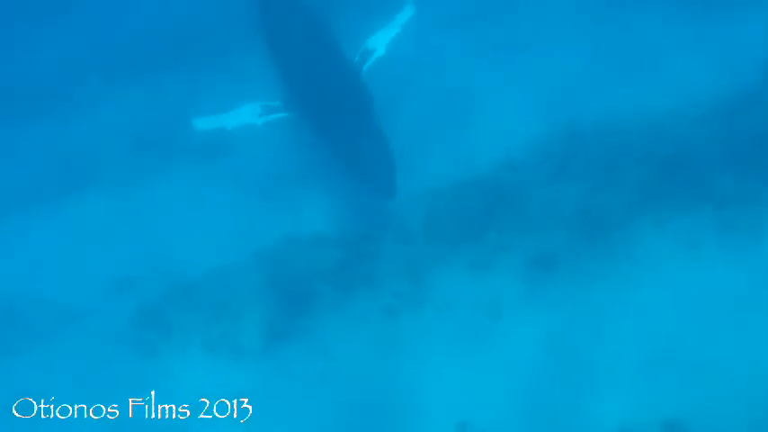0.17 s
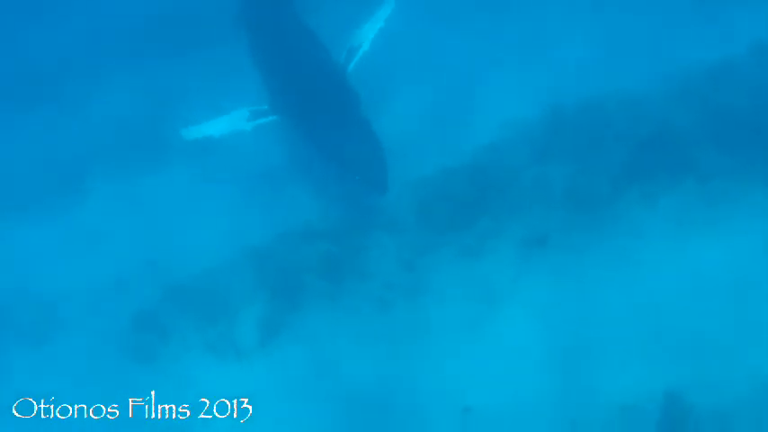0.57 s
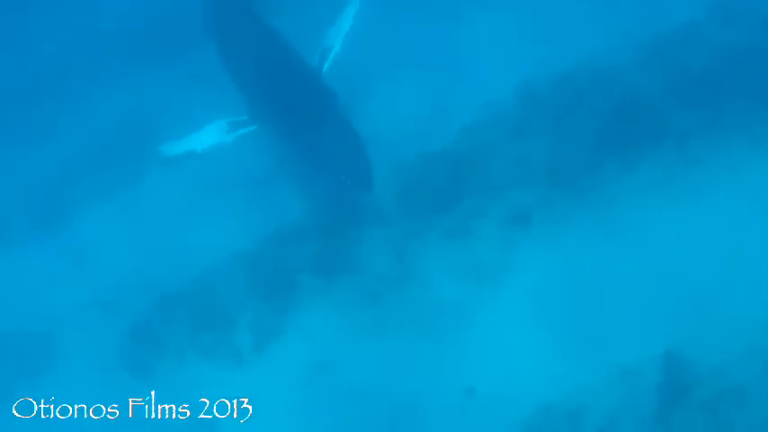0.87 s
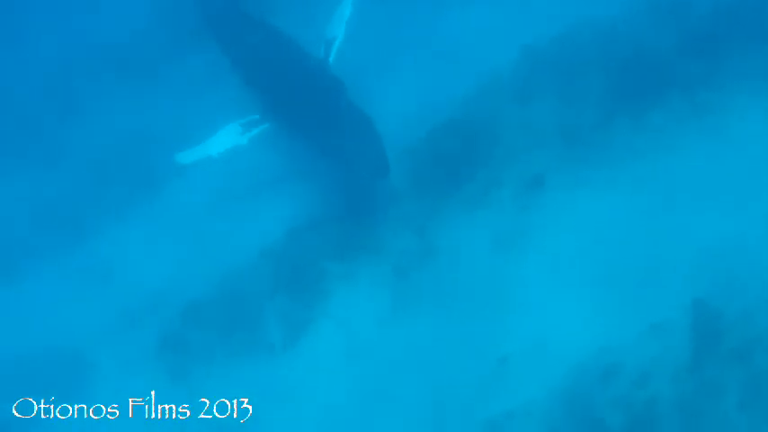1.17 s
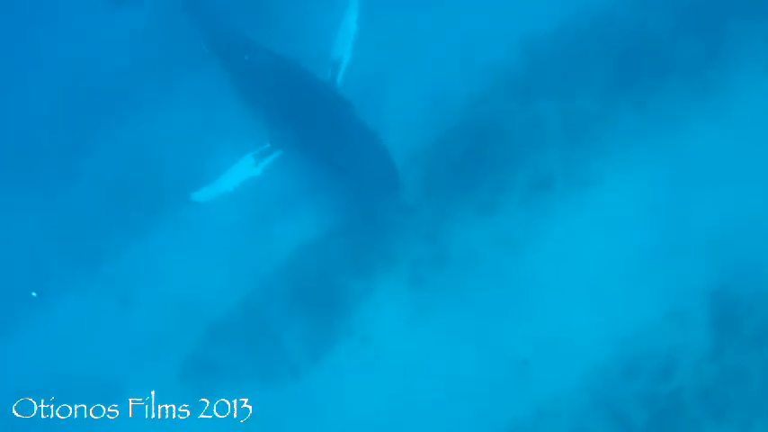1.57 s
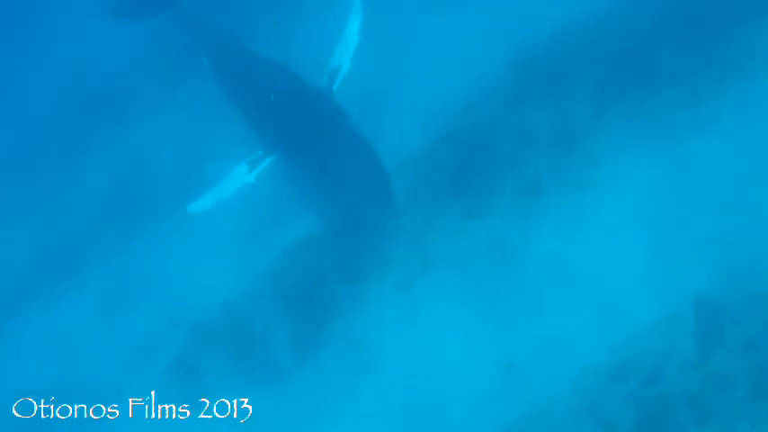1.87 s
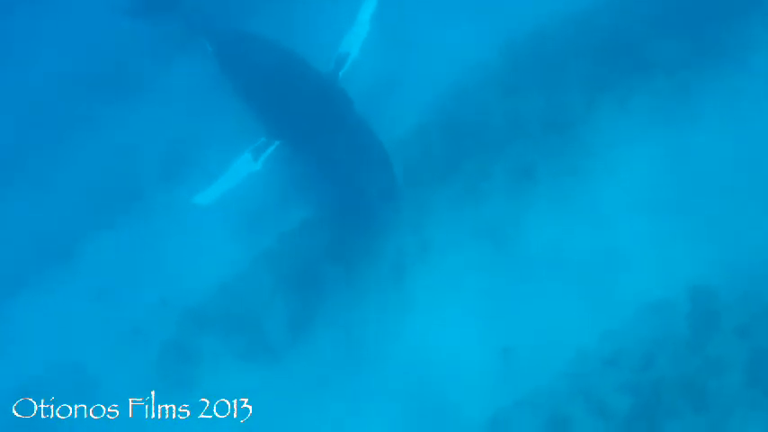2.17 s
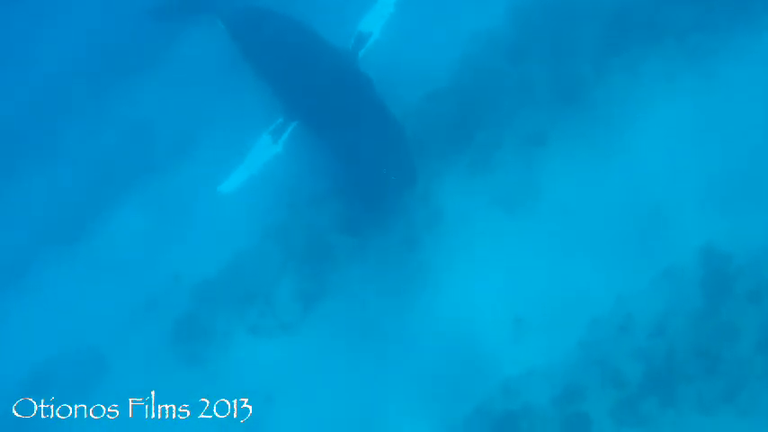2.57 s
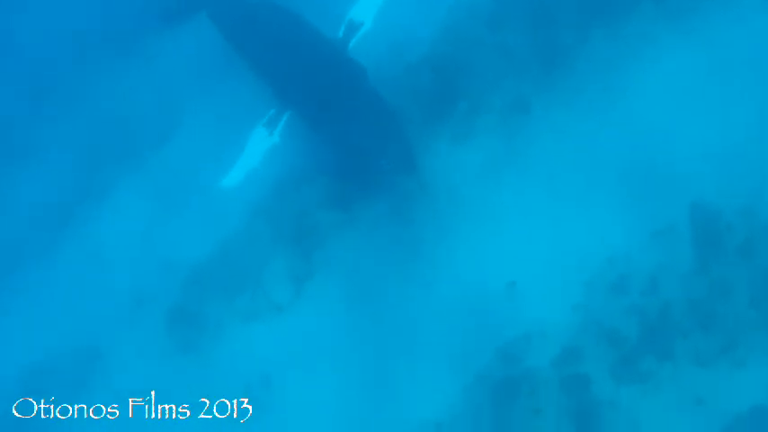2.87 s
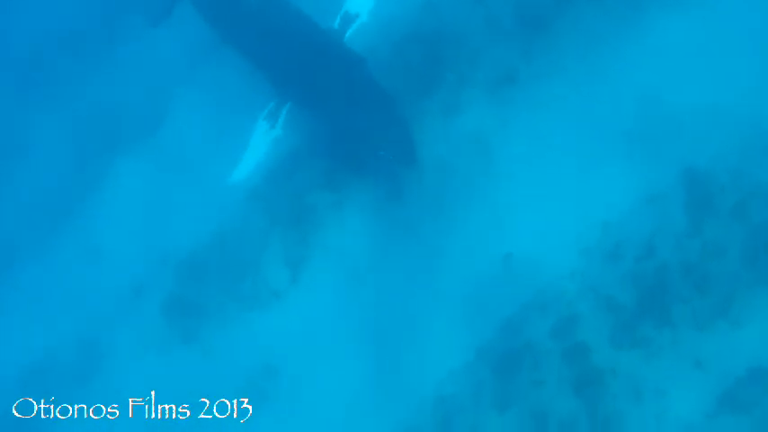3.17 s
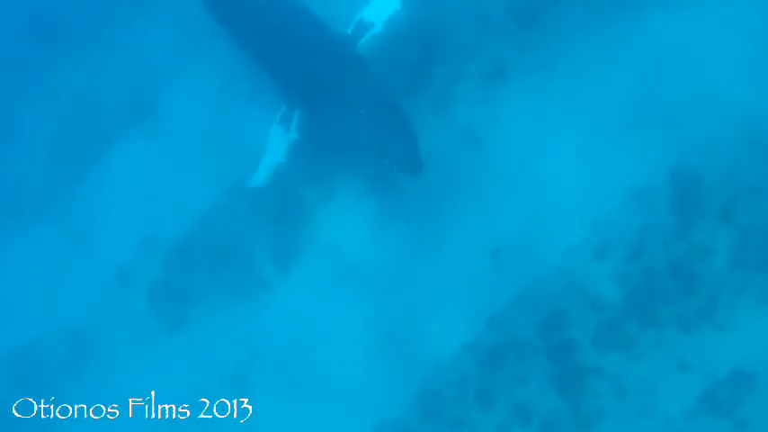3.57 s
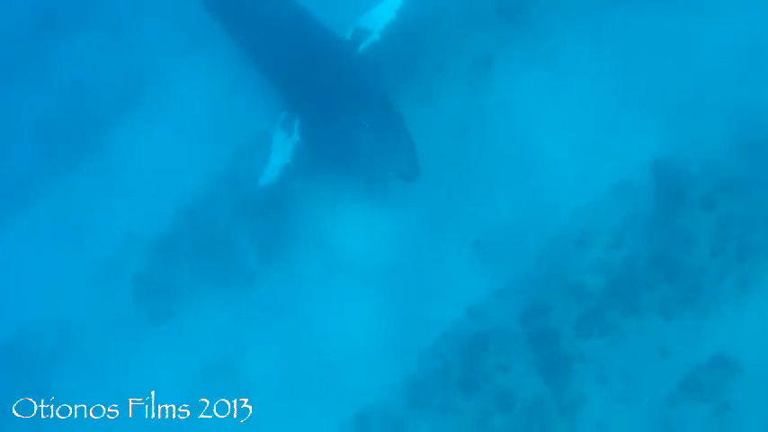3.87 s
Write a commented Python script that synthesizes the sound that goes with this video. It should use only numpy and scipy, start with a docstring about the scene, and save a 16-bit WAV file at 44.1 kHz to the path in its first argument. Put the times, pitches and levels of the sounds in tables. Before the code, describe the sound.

A humpback whale sings close by underwater, whistling downward, moaning upward, later giving one brief yelp.

```python
"""Low water rumble and ticks; a croak opens a fluttering whistle that steps down, then a rising moan
and, after more ticks, a short falling yelp: a humpback whale hanging head-down in shallow clear water.
Song: sine partials with sidebands, plus overtones and noise through body resonances; diffuse echoes.
Water: shaped noise. Ticks, thumps, snaps: decaying sines and struck housing modes.
A camera in the housing samples coarsely, which mirrors every sound around its sampling rate."""
import sys
import numpy as np
from scipy import signal
from scipy.fft import rfft, irfft
from scipy.io import wavfile
from scipy.ndimage import uniform_filter1d

SR = 44100
rng = np.random.default_rng(int(sys.argv[2]) if len(sys.argv) > 2 else 0)


def gain_from_db(level_db):
    """Turn a decibel level (scalar or array-like) into a linear amplitude factor."""
    decades = np.asarray(level_db, float) / 20
    return 10 ** decades


def log_audio(samples):
    """Write samples as a 16-bit WAV file to the path given in sys.argv[1]."""
    # one column per channel
    frames = np.atleast_2d(samples).T
    # limit to full scale, then quantise
    limited = np.clip(frames, -1, 1)
    pcm = np.round(limited * 32767).astype(np.int16)
    wavfile.write(sys.argv[1], SR, pcm)


N = 176400


def rms_one(x):
    """Scale to rms 1."""
    return x / np.sqrt(np.mean(x ** 2) + 1e-20)


def filtered(x, order, hz, kind):
    """Butterworth filter, causal."""
    return signal.sosfilt(signal.butter(order, hz, kind, fs=SR, output="sos"), x)


def in_time(rows, t):
    """Columns of a table (first column: seconds) interpolated at times t."""
    s, *columns = np.transpose(rows)
    return [np.interp(t, s, c) for c in columns]


def drift(rate_hz, size=N):
    """Random wander of rms 1: white noise through two equal poles at rate_hz."""
    r = np.exp(-2 * np.pi * rate_hz / SR)
    wander = signal.lfilter([1], [1, -2 * r, r * r], rng.standard_normal(size + SR))
    return rms_one(wander[SR:])


def ring(start_s, db, hz, t60_s):
    """A decaying sine that swells over three cycles."""
    t = np.maximum(np.arange(N) / SR - start_s, 0)
    swell = np.minimum(t * hz / 3, 1)
    return gain_from_db(db - 60 * t / t60_s) * np.sin(2 * np.pi * hz * t) * swell


def water():
    """Noise shaped by a spectrum; bass and the rest waver separately, the bass faster."""
    # Each row: frequency in Hz, relative density in dB per Hz.
    spectrum = [(12, -38), (20, 3.5), (60, -0.5), (228, -12), (405, -10.5), (514, -24.5), (6000, -34),
                (7800, -82.5)]
    level_db = -52
    hz, db = np.transpose(spectrum)
    f = np.maximum(np.arange(N // 2 + 1) * SR / N, 1)
    shaped = rfft(rng.standard_normal(N)) * gain_from_db(np.interp(np.log(f), np.log(hz), db, right=-120))
    bass_share = 1 / (1 + (f / 130) ** 4)
    bass = irfft(shaped * bass_share, N) * gain_from_db(0.53 * drift(2.5))
    rest = irfft(shaped * (1 - bass_share), N) * gain_from_db(0.92 * drift(0.82))
    return gain_from_db(level_db) * rms_one(bass + rest)


def far_murmur():
    """A wavering far hum near 400 Hz: band-passed noise."""
    # Each row: time in seconds, level in dB.
    levels = [(0, -62.5), (2.9, -65.5), (3.3, -53), (4, -60.5)]
    hum = filtered(rng.standard_normal(N), 2, [290, 600], "band")
    level_db = in_time(levels, np.arange(N) / SR)[0] + 2 * drift(1.4)
    return gain_from_db(level_db) * rms_one(hum)


def housing(clicks):
    """Each click strikes every housing mode, a decaying sine, with a strength of its own."""
    # Each entry: mode frequency in Hz.
    modes_hz = [1016, 1600, 2450, 3700]
    t60_s = 0.015
    r = gain_from_db(-60 / (t60_s * SR))
    out = 0
    for hz in modes_hz:
        w = 2 * np.pi * hz / SR
        strength = gain_from_db(rng.uniform(-14, 0, N))
        struck = clicks * strength + 1e-18
        out = out + signal.lfilter([0, np.sin(w)], [1, -2 * r * np.cos(w), r * r], struck)
    return out


def snaps():
    """Faint random snaps of shrimp ring the housing, at a wandering rate."""
    rate_per_s, level_db = 15, -55
    hits = rng.random(N) < rate_per_s * gain_from_db(6.0 * drift(2)) / SR
    strength = gain_from_db(4.4 * rng.exponential(1, N).clip(0, 2))
    return gain_from_db(level_db) * housing(hits * strength)


def rattle(song):
    """Loud song shakes a bass rumble out of the housing: noise led by the root of the song's level."""
    level_db = -47
    rumble = rms_one(filtered(rng.standard_normal(N), 2, [25, 110], "band"))
    song_level = np.abs(uniform_filter1d(np.abs(song), size=4000))
    return gain_from_db(level_db) * rumble * np.sqrt(song_level)


def ticks():
    """Each tick is a decaying bubble tone with a crack that rings the housing modes."""
    # Each row: start in seconds, level in dB, bubble tone in Hz.
    events = [(0.012, -45.5, 1770), (0.076, -38, 2220), (0.095, -42.5, 2450), (2.614, -36.5, 1046),
              (2.622, -39, 2240), (2.651, -30.5, 890), (2.678, -44.5, 1680), (2.712, -44, 1600),
              (2.855, -43, 1290), (3.31, -48, 1747), (3.352, -38, 975), (3.524, -42, 1000),
              (3.945, -37.5, 870)]
    crack_db, t60_s = -5.5, 0.044  # crack relative to bubble
    clicks = np.zeros(N)
    for s, db, hz in events:
        clicks[int(s * SR)] = gain_from_db(db + crack_db)
    bubbles = sum(ring(s, db, hz, t60_s) for s, db, hz in events)
    return housing(clicks) + bubbles


def thumps():
    """Water bumps the housing: low decaying sines."""
    # Each row: start in seconds, level in dB, frequency in Hz.
    events = [(0.232, -25, 116), (2.779, -21, 53.8), (2.868, -19, 50.4)]
    return sum(ring(s, db, hz, 0.11) for s, db, hz in events)


def echoes(song):
    """Surface and sea bed return a diffuse tail short of bass; the moving surface blurs its lines."""
    t60_s, level_db = 0.56, -15
    t = np.arange(SR) / SR
    tail = rng.standard_normal(SR) * gain_from_db(-60 * t / t60_s) * np.minimum(t / 0.01, 1)
    tail = filtered(tail / np.sqrt(np.sum(tail ** 2)), 2, 800, "high")
    blurred = song * (1 + 0.99 * drift(49.0))
    return gain_from_db(level_db) * signal.fftconvolve(blurred, tail)[:N]


def body(x):
    """Parallel resonances of body and housing, signs alternating."""
    # Each row: frequency in Hz, width in Hz, gain in dB.
    resonances = [(348, 43, 3), (538.5, 10, 9), (747.5, 16, 9.5), (979.4, 31, 9.5), (1089, 30, 9),
                  (1201, 35.3, 10), (1334, 40, 2.5), (1533, 44, 0.5), (1890, 447, -5.5), (2302, 76, 8),
                  (2563, 106, 4), (2784, 160, -7.5), (3037, 480, -12), (3625, 280, -17)]
    out = 0
    for k, (hz, width_hz, db) in enumerate(resonances):
        r = np.exp(-np.pi * width_hz / SR)
        poles = [1, -2 * r * np.cos(2 * np.pi * hz / SR), r * r]
        out = out + gain_from_db(db) * (-1) ** k * signal.lfilter([1 - r * r, 0, r * r - 1], poles, x + 1e-18)
    return out


def evened(x, low_hz):
    """Scale so that the rms above low_hz stays near 1, over about 60 ms."""
    top = filtered(x, 4, low_hz, "high")
    return x / np.sqrt(uniform_filter1d(top ** 2, size=2600) + 1e-9)


def croak():
    """Uneven pulses and a little noise ring the body."""
    # Each row: time in seconds, pulses per second, level in dB.
    course = [(.17, 96, -61.5), (.25, 122, -33.5), (.29, 209, -24), (.33, 100, -24.5), (.4, 60, -44)]
    jitter = 0.26
    t = np.arange(N) / SR
    rate, db = in_time(course, t)
    turns = np.floor(np.cumsum(rate * (1 + jitter * drift(60.0))) / SR)
    pulses = np.diff(turns, prepend=0) * gain_from_db(3.1 * rng.standard_normal(N))
    pulses = signal.lfilter([1], [1, -0.9], pulses) + 0.23 * rng.standard_normal(N)
    sounding = (t > course[0][0]) * (t < course[-1][0])
    return gain_from_db(db) * evened(body(pulses), 200) * sounding


def note(rows, flutters, low_hz):
    """Clean low partials plus pulsed, shimmering, partly noisy overtones through the body; flutters 0 or 1."""
    # Slow second vibration. Each row: time in seconds, rate in Hz, upper and lower sideband in dB.
    flutter = [(.3, 95.7, -20.5, -11), (.45, 93.7, -27, -39), (.82, 96, -18.5, -43),
               (.875, 87, -8.5, -17.5), (.95, 87.05, -4, -9.5), (1.085, 86.2, -6, -2.5),
               (1.1, 86, -15.5, -14.5), (1.17, 78, -24, -21.5), (1.5, 65.3, -24, -29.5)]
    # Each entry: level in dB of the second, then third sideband under the first.
    far_sideband_db = [-12.5, -23]
    # Each row: time in seconds, roughness (noise share, 0-1) of the overtones.
    roughness = [(.3, .9), (.42, .62), (1.15, .9), (1.6, .9), (1.72, .3), (1.84, .3), (1.92, .6), (2.0, .3),
                 (2.12, .55), (2.2, .2), (2.31, .2), (2.37, .7), (2.45, .3), (3.7, .55), (3.775, .97)]
    # Each row: time in seconds, gain in dB above treble_hz.
    treble = [(.6, 9), (1.0, -4), (1.7, 2), (1.9, 2), (2.1, 9), (2.25, 11.5), (2.42, 5.5), (3.74, 9.5),
              (3.78, -19.5)]
    # Alternate cycles differ. Each row: time in seconds, share (0-1).
    half_pitch = [(1.97, 0.00044), (2.1, 0.33), (2.2, 0.034)]
    treble_hz, shimmer_db, edge_s = 2800, 4, 0.0066
    waver, tilt = 0.0037, 0.66  # pitch wander share; exponent of overtone fall
    ragged_db = 5.5  # how far the tiring whistle breaks up
    pulsing = 0.9  # how hard the flutter gates the overtones

    a, b = int(rows[0][0] * SR), int(rows[-1][0] * SR)
    size = b - a
    t = np.arange(a, b) / SR
    hz, first_db, second_db, over_db = in_time(rows, t)
    rate, up_db, down_db = in_time(flutter, t)
    rough = in_time(roughness, t)[0]
    half = np.clip(in_time(half_pitch, t)[0], 0, 1)
    treble_db = in_time(treble, t)[0]
    phase = 2 * np.pi * np.cumsum(hz * (1 + waver * rough * drift(27.0, size))) / SR
    slow = 2 * np.pi * np.cumsum(rate * (1 + 0.017 * drift(9.3, size))) / SR

    sides = 0
    for k, db in enumerate([0] + far_sideband_db, start=1):
        upper = gain_from_db(up_db) * np.exp(1j * k * slow)
        lower = gain_from_db(down_db) * np.exp(-1j * k * slow)
        sides = sides + gain_from_db(db) * (upper + lower)
    tiring = np.clip((t - 1.33) / 0.029, 0, 1)
    first_level = gain_from_db(first_db + ragged_db * flutters * tiring * drift(25.0, size))
    low = first_level * np.real((1 + flutters * sides) * np.exp(1j * phase))
    second_level = gain_from_db(second_db + ragged_db * flutters * drift(31.0, size))
    low = low + second_level * np.sin(2 * phase + 1)
    low = low + flutters * gain_from_db(first_db + up_db - 1.5) * np.sin(2 * phase - slow)
    low = low + gain_from_db(first_db - 9.0) * half * np.sin(3 * phase / 2)

    tones = 0
    for k in range(3 - flutters, 26 - 14 * flutters):
        level = k ** -tilt / (1 + flutters * (k / 14.5) ** 4)
        shimmer = gain_from_db(shimmer_db * drift(6.7, size))
        fade = np.clip(4 - k * hz / 1250, 0, 1)  # gone by 5 kHz
        tones = tones + level * shimmer * np.sin(k * phase + 0.58 * k * k) * fade
    tones = rms_one(tones) * (1 + half * 2 * np.cos(phase / 2))
    noise = 1.38 * rng.standard_normal(size) * (1 + np.cos(phase))
    gate = np.exp(flutters * pulsing * np.cos(slow))
    source = np.sqrt(1 - rough ** 2) * tones * gate + rough * noise * np.sqrt(gate)
    source = filtered(source, 2, 420, "high")
    high_pass = signal.butter(2, treble_hz, "high", fs=SR, output="sos")
    source = source + (gain_from_db(treble_db) - 1) * signal.sosfiltfilt(high_pass, source)
    overtones = gain_from_db(over_db) * evened(body(source), low_hz)

    edges = np.clip(np.minimum(t - t[0], t[-1] - t) / edge_s, 0, 1)
    out = np.zeros(N)
    out[a:b] = (np.sqrt(2) * low + overtones) * edges
    return out


def whistle():
    """A fluttering whistle at three pitches, high, middle and deep; a lower sideband rises under its start."""
    # Each row: time in seconds, pitch in Hz, fundamental, second partial and overtones in dB.
    lower_sideband = [(.2, 304.6, -46.5, -67.5, -58), (.29, 566.7, -20, -26, -60.5),
                      (.37, 633, -21, -27, -65)]
    high = [(.31, 689.7, -24, -34.5, -31), (.39, 751, -12, -47, -37), (.5, 750.5, -13.5, -43, -35),
            (.84, 714.3, -15.5, -56.5, -28.5), (1.0, 694, -18, -40.5, -26), (1.1, 693.6, -19, -42, -30.5)]
    middle = [(1.09, 603.7, -14, -33, -28.5), (1.14, 587, -13, -31.5, -25), (1.205, 536.8, -10, -35, -28.5),
              (1.285, 488.6, -27.5, -29, -32.5)]
    deep = [(1.28, 386.8, -7, -23, -23), (1.305, 341.2, -10, -43.5, -33.5), (1.338, 316, -11.5, -40.5, -29),
            (1.352, 301.3, -26.5, -40, -27.5), (1.39, 281.2, -31, -38.5, -31),
            (1.49, 224.1, -54, -55.5, -41)]
    start = note(lower_sideband, 1, 1100) + note(high, 1, 560)
    return start + note(middle, 1, 750) + note(deep, 1, 400)


def moan():
    """A rising note without flutter, overtones up to the 25th."""
    # Each row: time in seconds, pitch in Hz, fundamental, second partial and overtones in dB.
    course = [(1.6, 178.2, -55.5, -63, -50), (1.65, 183.3, -37.5, -34.5, -38),
              (1.7, 193.5, -17.5, -27.5, -24), (1.755, 192.4, -8.5, -21, -21),
              (1.85, 198.1, -1.5, -17, -20), (1.89, 205.8, -6.5, -15.5, -22),
              (1.93, 231.5, -3.5, -30, -22.5), (2.005, 252.6, -4.5, -27, -23.5),
              (2.055, 252.5, -7.5, -28, -24), (2.14, 266.6, -9, -24.5, -23.5),
              (2.325, 274.5, -13.5, -24, -21.5), (2.395, 316.9, -19, -40.5, -26.5),
              (2.5, 322.3, -22.5, -61.5, -45.5), (2.58, 311.7, -62, -46, -56.5)]
    return note(course, 0, 1000)


def yelp():
    """A short falling note without flutter."""
    # Each row: time in seconds, pitch in Hz, fundamental, second partial and overtones in dB.
    course = [(3.68, 838.5, -47.5, -55, -56), (3.705, 685.5, -34.5, -41, -38),
              (3.722, 581.7, -30, -20.5, -24.5), (3.738, 533.5, -8.5, -19, -29),
              (3.768, 538.6, -8.5, -31.5, -31), (3.782, 521, -25, -49.5, -36.5),
              (3.8, 600, -35.5, -52, -35.5)]
    return note(course, 0, 760)


def scene():
    """Water, small events, echoes and song."""
    song = croak() + whistle() + moan() + yelp()
    background = water() + far_murmur() + snaps() + rattle(song)
    return (background + ticks() + thumps() + echoes(song) + song)[None]


def band_limit(x):
    """A steep low-pass at the top of the band."""
    return signal.sosfilt(signal.butter(12, 15680, fs=SR, output="sos"), x)


def record(dry):
    """Soft limit, input low-pass, coarse sampling: images round the sampling rate, sample-hold roll-off."""
    ceiling, input_cut_hz, sampling_hz, cutoff_hz = 1.0, 4650, 12000, 15500
    limited = dry / (1 + np.abs(dry / ceiling) ** 4) ** 0.25
    smooth = filtered(limited, 4, input_cut_hz, "low")
    mirrored = smooth * (1 + 2 * np.cos(2 * np.pi * sampling_hz * np.arange(N) / SR))
    f = np.arange(N // 2 + 1) * SR / N
    hold = np.sinc(f / sampling_hz)  # each sample held for a whole step
    mix = irfft(rfft(mirrored) * hold * (f < cutoff_hz), N)
    return band_limit(mix)


dry = scene()
out = record(dry)
log_audio(out)
```